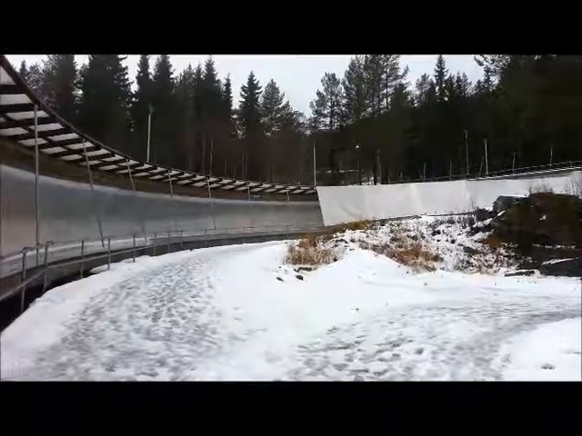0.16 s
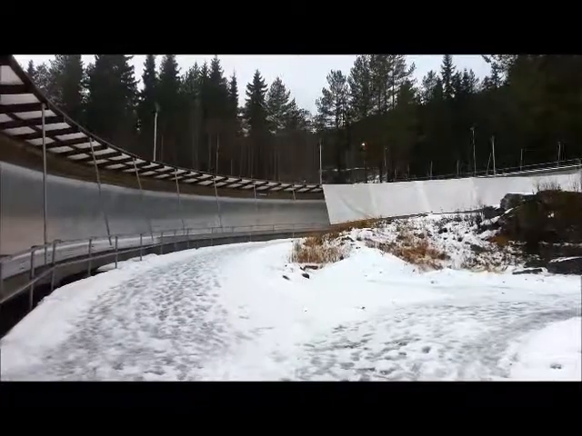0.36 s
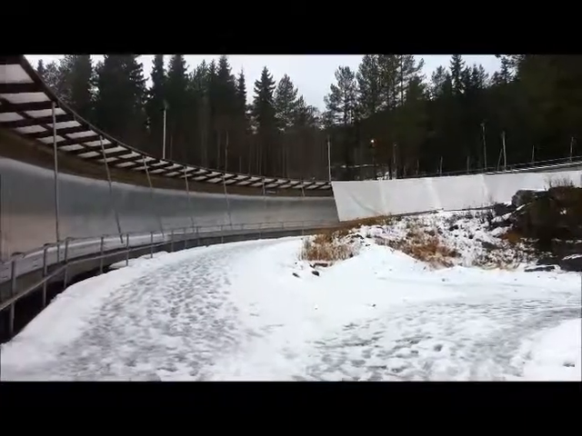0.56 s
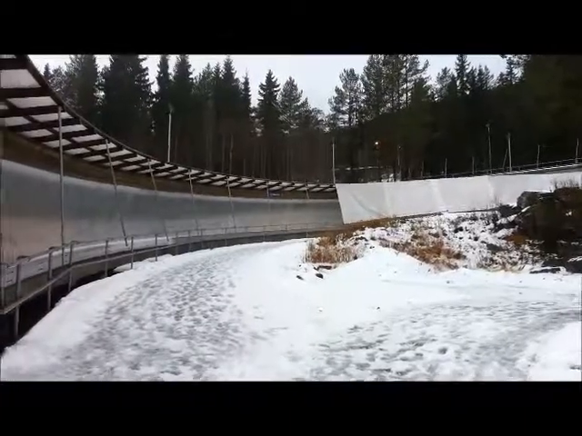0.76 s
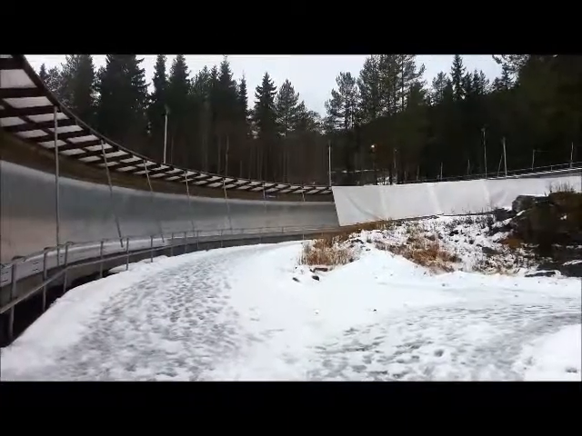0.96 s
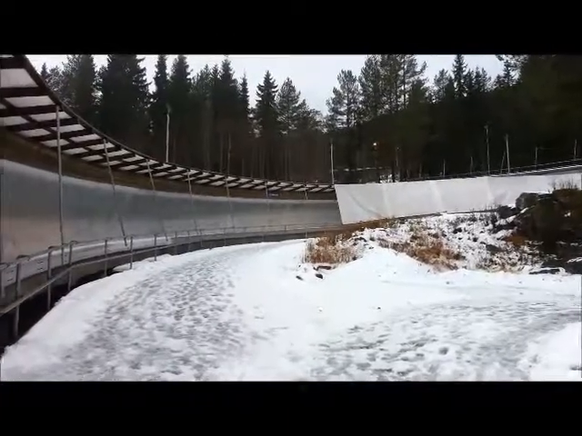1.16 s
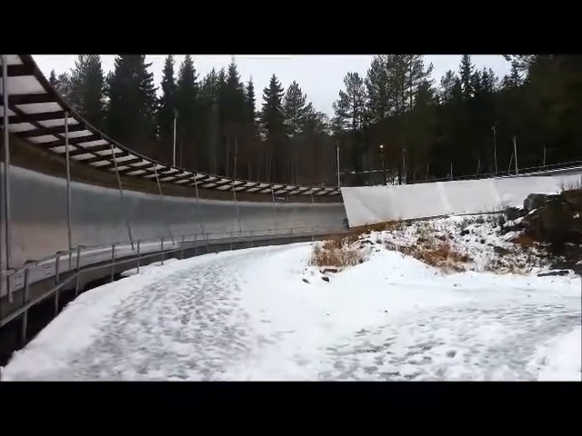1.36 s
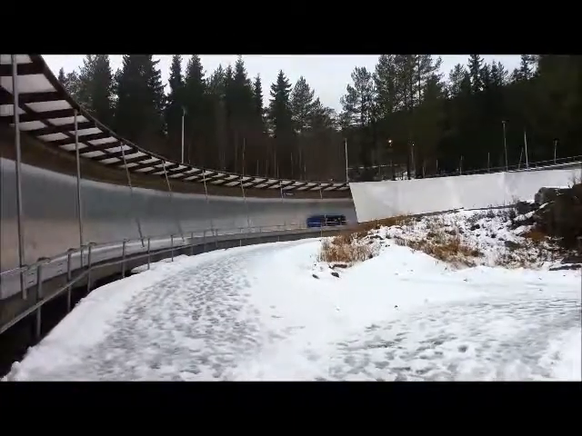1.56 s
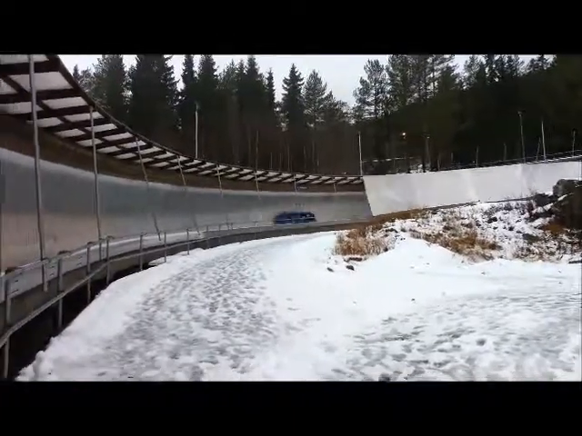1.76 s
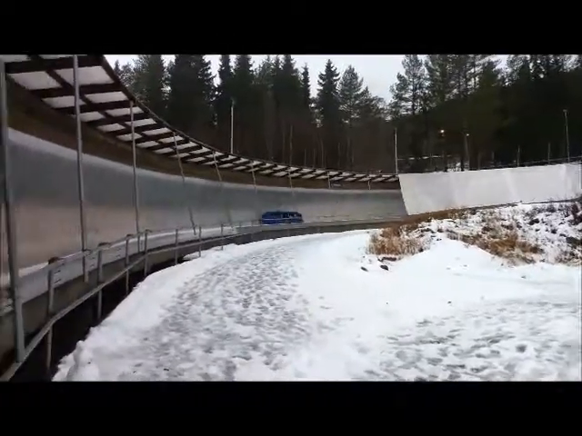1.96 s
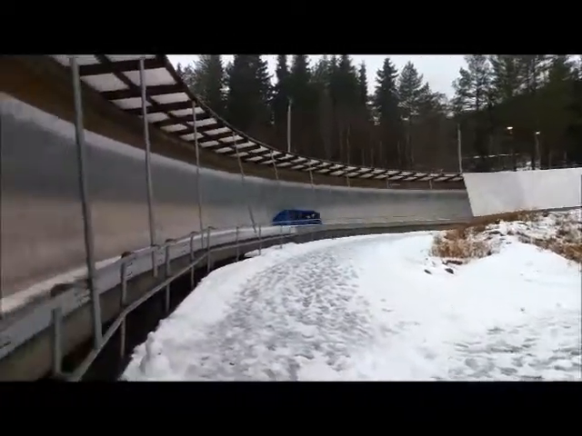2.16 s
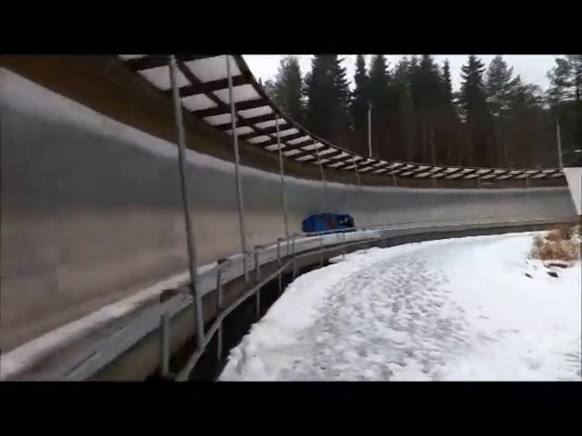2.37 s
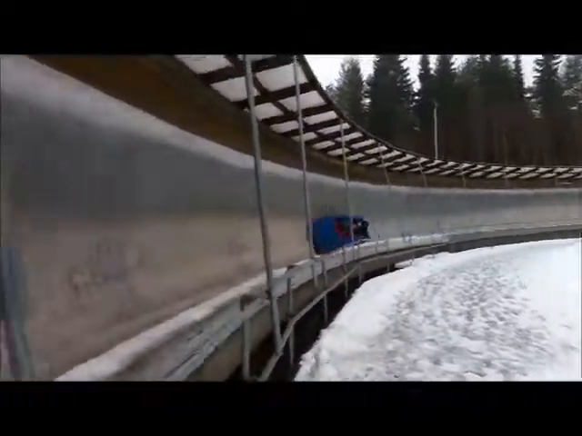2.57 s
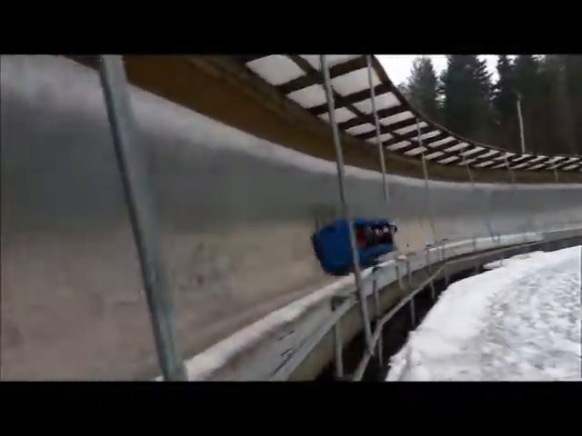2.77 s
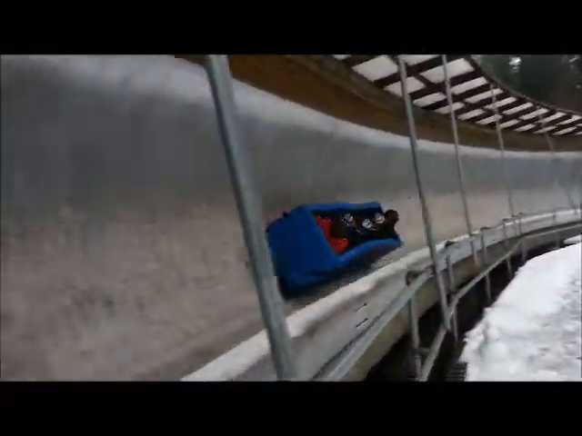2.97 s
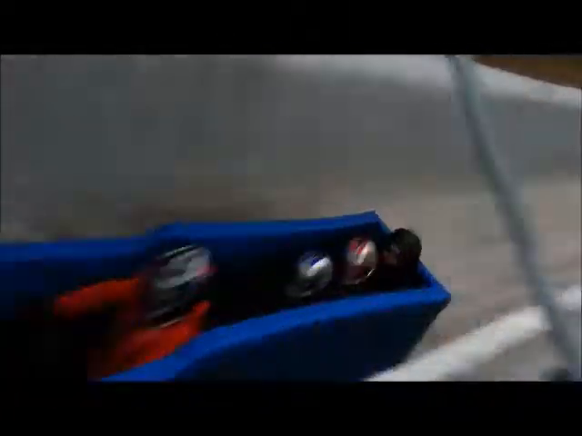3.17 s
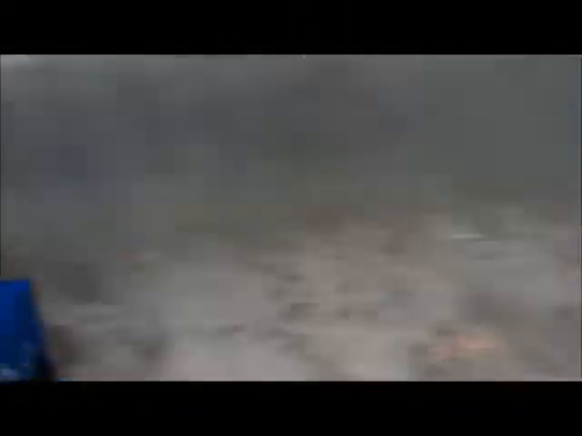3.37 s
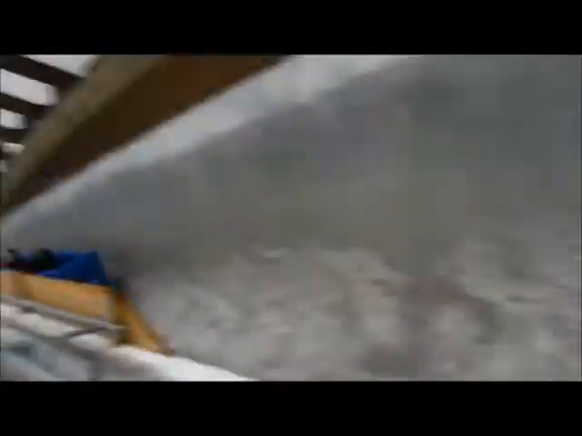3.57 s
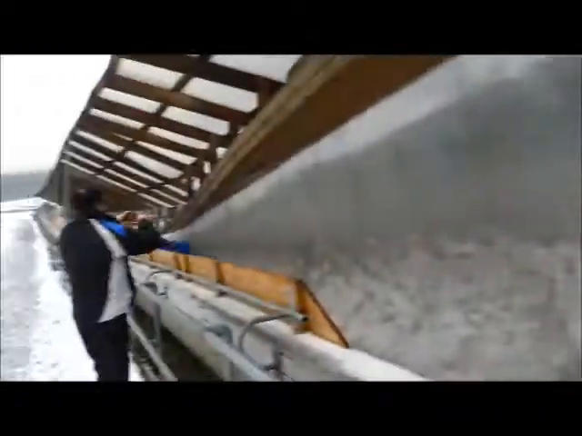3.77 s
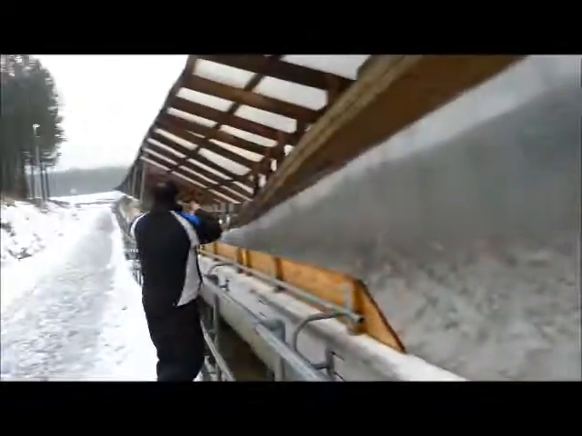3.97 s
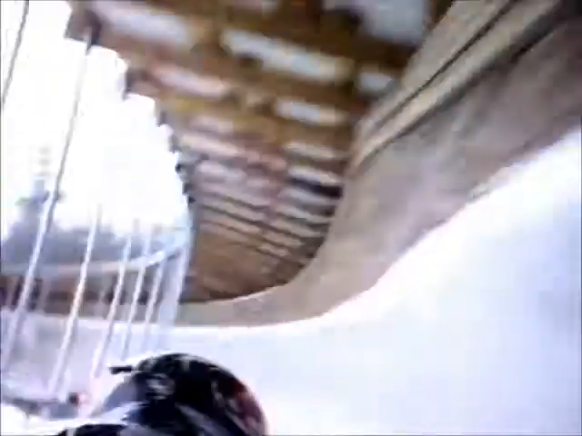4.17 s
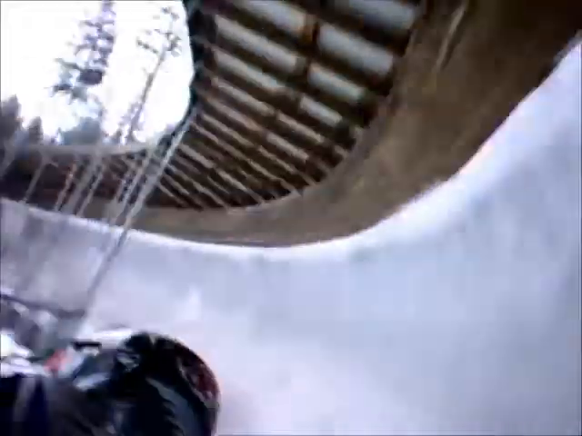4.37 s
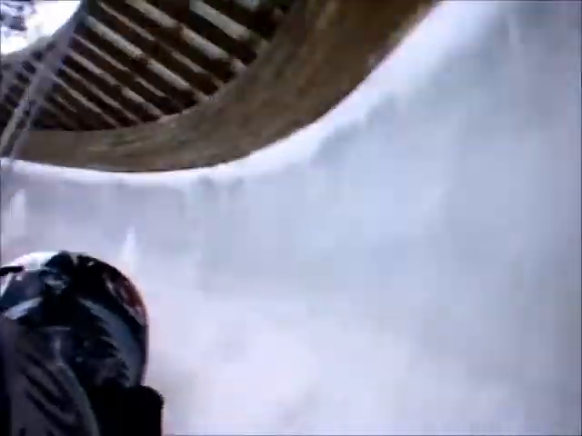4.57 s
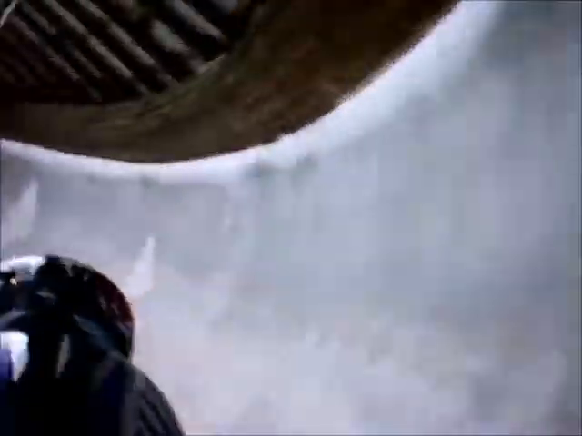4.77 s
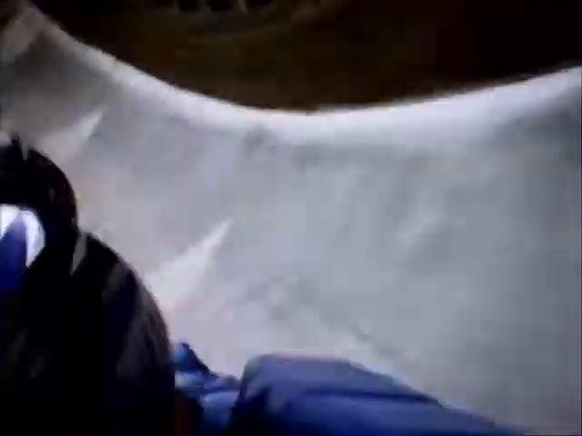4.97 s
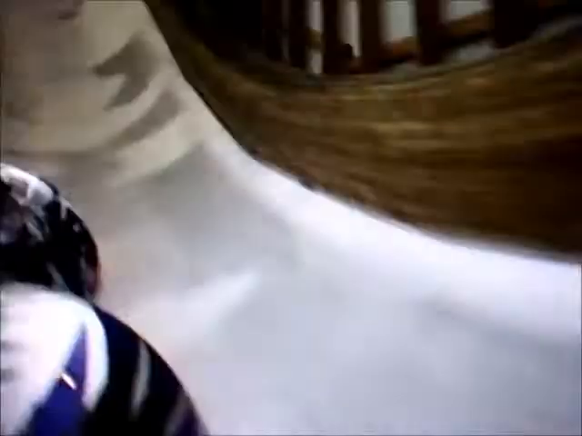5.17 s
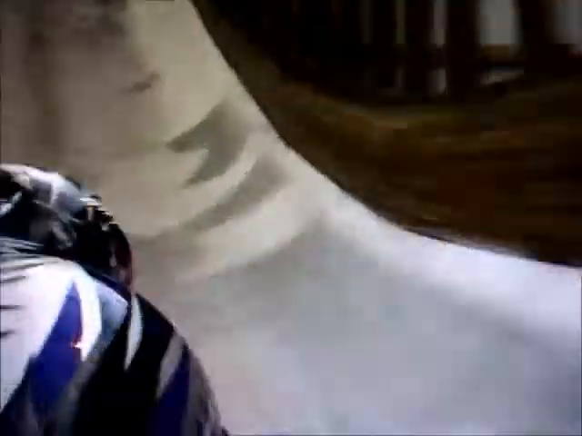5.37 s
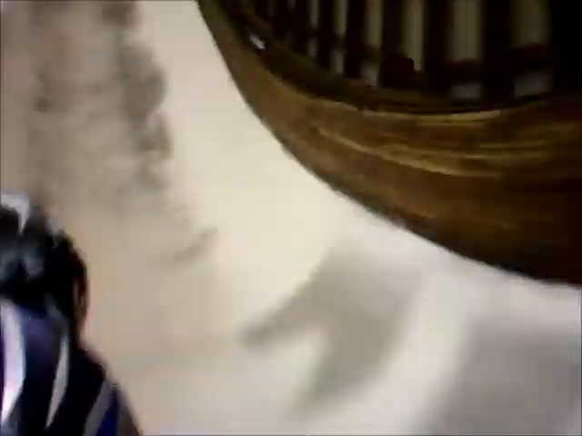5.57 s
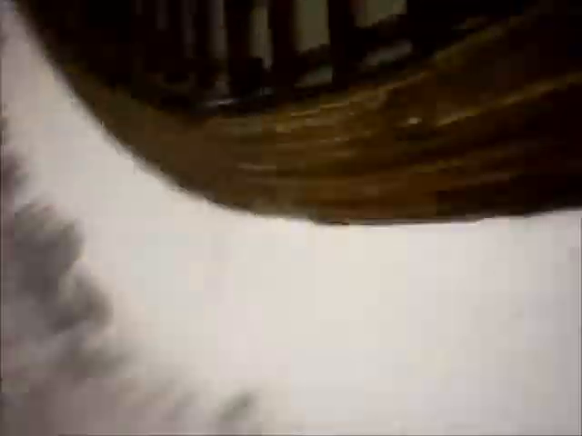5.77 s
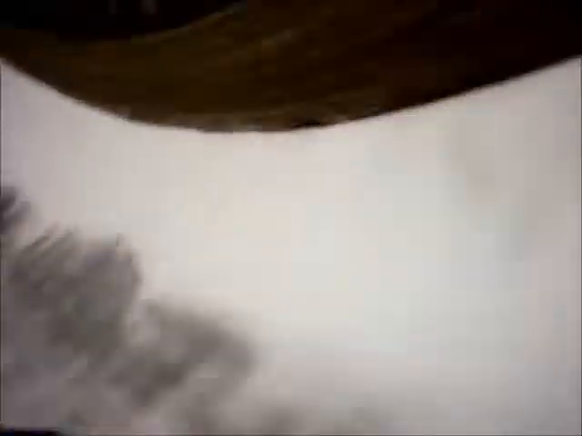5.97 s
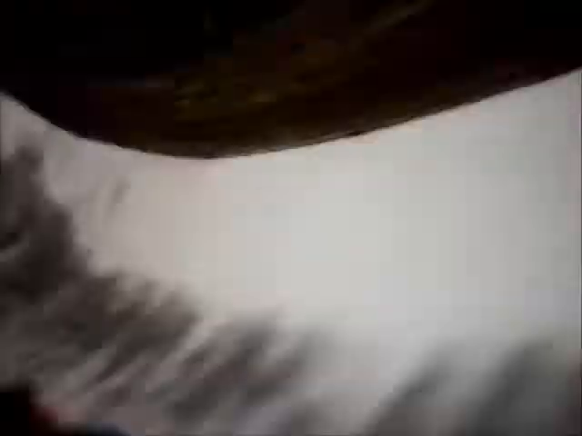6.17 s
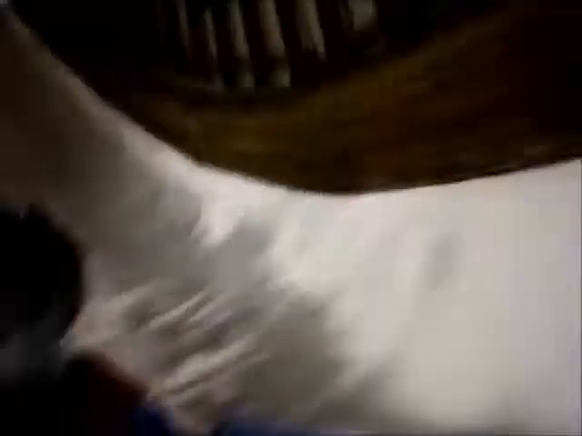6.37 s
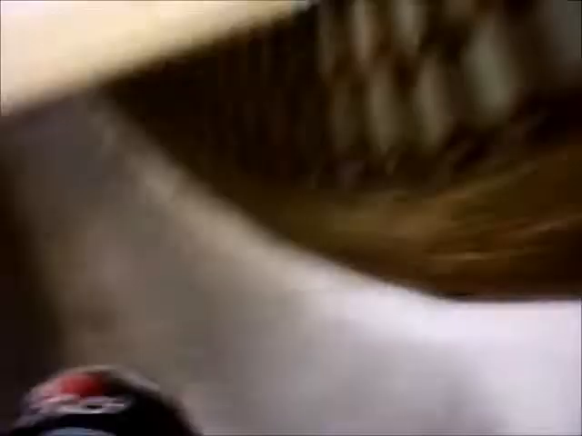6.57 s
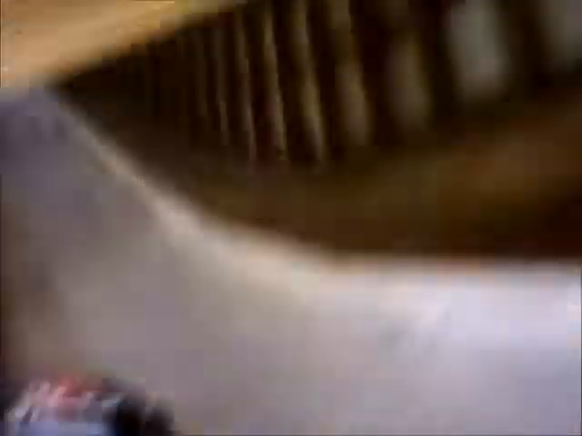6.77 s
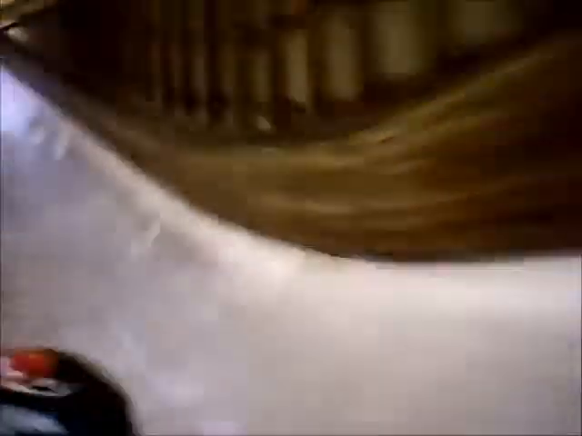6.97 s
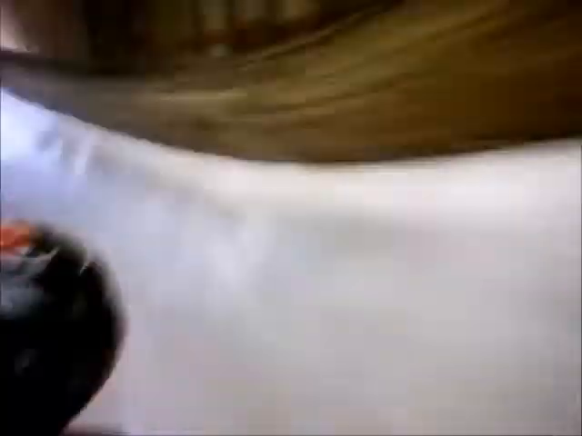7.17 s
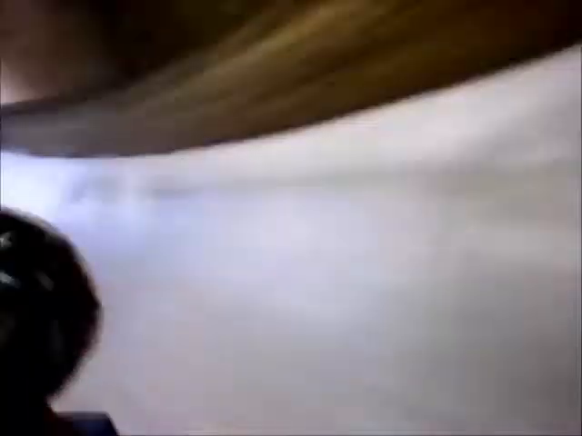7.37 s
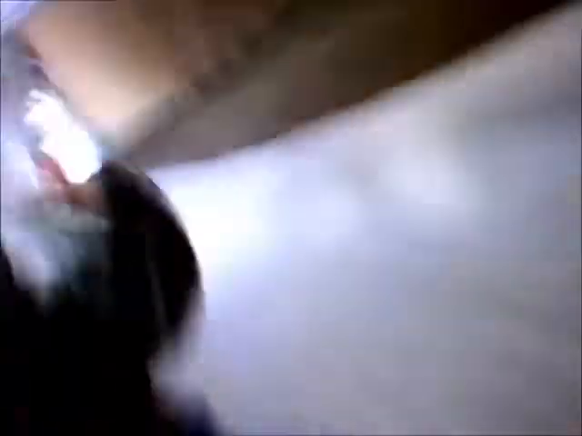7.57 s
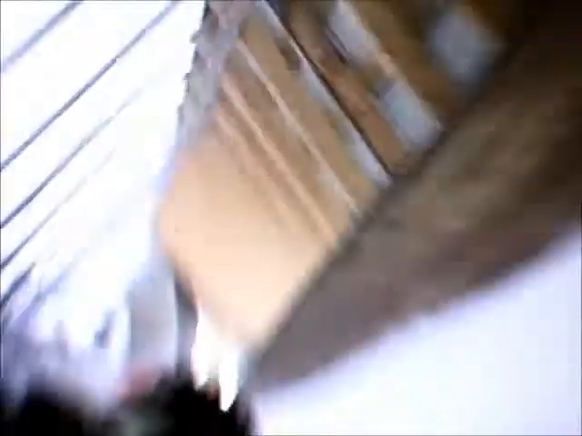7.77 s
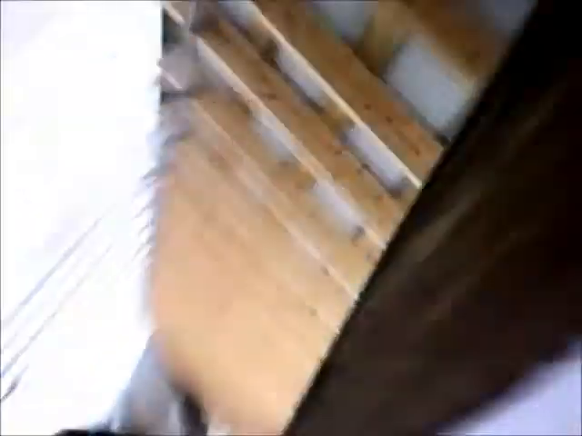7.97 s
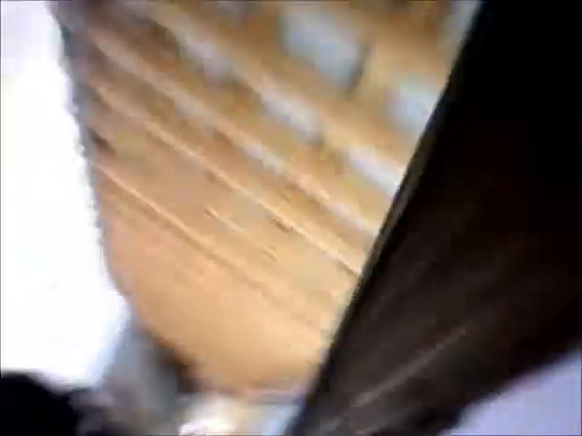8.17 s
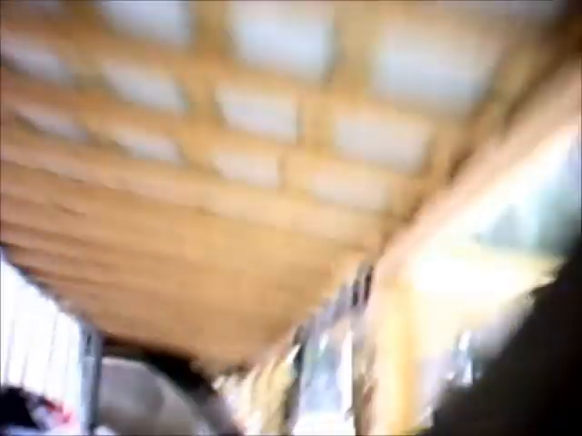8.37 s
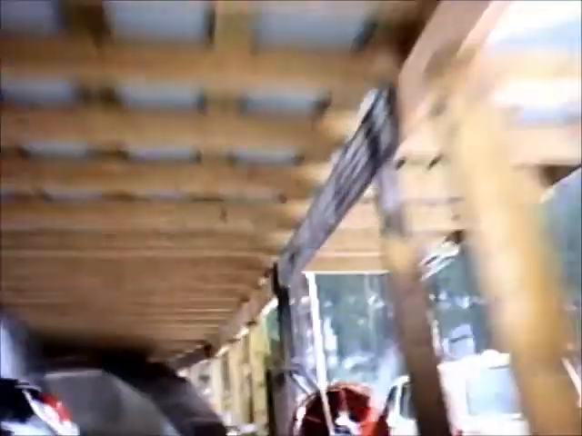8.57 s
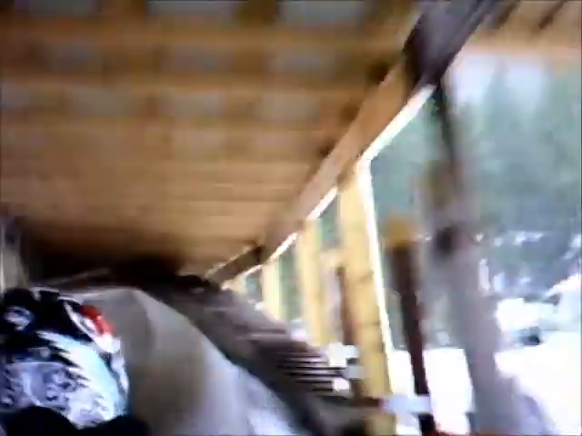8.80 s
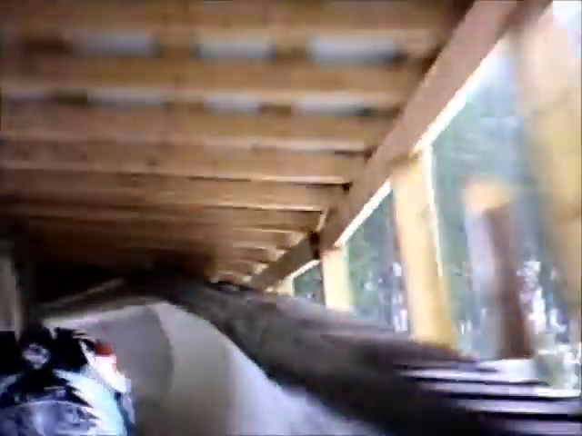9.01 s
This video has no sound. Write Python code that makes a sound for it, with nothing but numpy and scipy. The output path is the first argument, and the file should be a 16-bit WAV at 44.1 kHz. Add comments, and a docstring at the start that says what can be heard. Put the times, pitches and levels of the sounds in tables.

```python
"""A distant roar comes down a banked ice track, swells over rumble and runner scrape, and a sled rushes past.
Trackside, in stereo: coloured noise for channel, scrape and treble, plus damped modes for jolts and a click.
Then a hard cut to a small mono camera on board: gusts of wind and runner chatter ring its housing,
the hull drones, the air stream buffets the microphone, and struck modes make the knocks and thumps."""
import sys
import numpy as np
from scipy import signal
from scipy.fft import rfft, irfft
from scipy.io import wavfile
from scipy.ndimage import uniform_filter1d, map_coordinates

SR = 44100
rng = np.random.default_rng(int(sys.argv[2]) if len(sys.argv) > 2 else 0)


def int16_out(signal):
    """Quantize to a 16-bit WAV file."""
    q = np.round(np.clip(np.atleast_2d(signal).T, -1, 1) * 32767)
    wavfile.write(sys.argv[1], SR, q.astype(np.int16))


N = 398663
T = np.arange(N) / SR
CUT_S = 4.136  # from trackside to on board
TURN_S, TURN_SPAN_S = 3.23, 0.363  # the sled is abreast; length of the change from coming to going


def undb(db):
    """Decibels to amplitude."""
    return 10 ** (np.asarray(db) / 20)


def curves(table):
    """Columns of a table as straight lines in time."""
    s, *columns = np.transpose(table)
    return [np.interp(T, s, c) for c in columns]


def colour(x, spectrum):
    """A causal minimum-phase resonator, so that clicks ring after they strike; keeps the rms of x."""
    hz, db = np.transpose(spectrum)
    f = np.maximum(np.arange(4097) * SR / 8192, 1)
    log_gain = np.log(undb(np.interp(np.log(f), np.log(hz), db, -90, -90)))
    # folding the cepstrum onto positive time makes the response causal
    cepstrum = irfft(log_gain)
    cepstrum[1:4096] *= 2
    cepstrum[4097:] = 0
    response = irfft(np.exp(rfft(cepstrum)))
    y = signal.fftconvolve(np.atleast_2d(x), response[None], axes=1)[:, :N]
    return y / np.sqrt(np.mean(y ** 2) / np.mean(x ** 2))


def walk(rate, slew):
    """Random levels held 1 / rate s, slewed over a share of that time; spread 1."""
    hold = int(SR / rate)
    steps = np.repeat(rng.standard_normal(N // 100), hold)[:N]
    w = uniform_filter1d(steps, max(int(slew * hold), 1))
    return w / np.std(w)


def grit(scatter_db, shape):
    """Dense grains: noise whose samples are scattered in level, so that a few stand out; rms 1."""
    scatter = np.minimum(rng.exponential(size=shape), 3.5)
    x = rng.standard_normal(shape) * undb(scatter_db * scatter)
    return x / np.std(x)


def ring(s, hz, t60, rise_hz_s=0):
    """One damped mode struck at s by a push that builds over half a cycle; its pitch may rise."""
    out, start = np.zeros(N), int(s * SR)
    t = np.maximum(T[start:start + int(2 * t60 * SR)] - s, 0)
    wave = np.sin(2 * np.pi * (hz + rise_hz_s * t / 2) * t)
    decay = np.exp(-np.log(1000) * t / t60)
    out[start:start + len(t)] = wave * decay * np.minimum(2 * hz * t, 1)
    return out


def bend(pair, speed):
    """Both ports played at a changing speed, which bends every resonance."""
    place = np.cumsum(speed)
    return np.array([np.interp(place, np.arange(N), port) for port in pair])


def squash(x, top):
    """An input stage that rounds peaks off towards top."""
    return x / (1 + np.abs(x / top) ** 4) ** .25


# direction of the sled: t/s, left lags right/ms, scattered share (scaled by each layer's width),
# left minus right/dB
SLED_BEARING = [(0, -0.36, 1.2, 0), (.6, 0.26, 0.56, -0.5), (1.9, 0.11, 0.6, -1), (2.3, 0.057, 0.45, -1),
                (3, 0.031, 0.3, -0.7), (3.6, 0.14, 0.38, -0.5), (4.2, -0.03, 0.27, 0)]


def ports(spectrum, scatter_db, width):
    """One source at two microphone ports: a direct path with a lag, and sound scattered by the walls."""
    lag_ms, share, pan_db = curves(SLED_BEARING)
    direct, left, right = colour(grit(scatter_db, (3, N)), spectrum)
    late = map_coordinates(direct, [np.arange(N) - lag_ms * SR / 1000], order=3, mode="nearest")
    share = np.clip(width * share, 0, 1)
    pair = np.sqrt(1 - share) * np.array([late, direct]) + np.sqrt(share) * np.array([left, right])
    return pair * undb(np.array([pan_db, -pan_db]) / 2)


def turn(coming, going):
    """Equal-power change to the channel's resonances heard from behind as the sled passes."""
    share = np.clip((T - TURN_S) / TURN_SPAN_S + .5, 0, 1)
    return np.sqrt(1 - share) * coming + np.sqrt(share) * going


# colour of the roofed channel, sled coming and going: f/Hz, relative level/dB per Hz
ROAR_AHEAD = [(200, -29.5), (290, -12), (400, -4.5), (470, -5.5), (560, -3), (660, -5.5), (820, -7),
              (1140, -6), (1330, -13), (1600, -11), (2200, -29)]
ROAR_BEHIND = [(200, -25), (285, 0.5), (370, -4), (500, -1.5), (620, -1), (760, -2), (900, -1.5),
               (1080, -6), (1290, -1.5), (1600, -12), (1900, -11), (2300, -16)]
ROAR_SAG_PER_S = .12  # share of its pitch lost per second


def channel_roar(level_db):
    """Noise through the channel's resonances; they sink in pitch as the sled draws away."""
    since = np.clip(T - TURN_S - TURN_SPAN_S, -.5, .5)
    passing = (T > TURN_S - TURN_SPAN_S) * (T < CUT_S)
    coming = ports(ROAR_AHEAD, scatter_db=1.5, width=0.34)
    going = bend(ports(ROAR_BEHIND, scatter_db=2.0, width=0.24), 1 - ROAR_SAG_PER_S * since * passing)
    return undb(level_db) * turn(coming, going)


# colour of the concrete, sled coming and going: f/Hz, relative level/dB per Hz
RUMBLE_AHEAD = [(20, -52), (45, -29), (65, -21.5), (100, -11.5), (150, -6.5), (260, 1), (340, -1.5),
                (600, -48)]
RUMBLE_BEHIND = [(20, -53), (50, -34), (90, -13.5), (150, -3.5), (260, 1), (340, -20.5), (600, -40)]


def concrete_rumble(level_db):
    """Low noise from the concrete, nearly the same at both ports."""
    coming = ports(RUMBLE_AHEAD, scatter_db=3.5, width=0.037)
    going = ports(RUMBLE_BEHIND, scatter_db=-1.5, width=0.025)
    return undb(level_db) * turn(coming, going)


# surges of the boom: t/s, level/dB
BOOM_SURGES = [(0.0, -39), (0.1, -26.5), (0.23, -46), (0.25, -29.5), (0.53, -30), (0.62, -18), (0.65, -37),
               (0.72, -32), (0.74, -13.5), (0.8, -13), (0.96, -21.5), (1.24, -11), (1.32, -21), (1.38, -12),
               (1.5, -18), (1.51, -15), (1.68, -24), (1.7, -14.5), (2.16, -23), (2.19, -9), (2.23, -16.5),
               (2.3, -14.5), (2.45, -17), (2.48, -5), (2.51, -25), (2.58, -11), (2.64, -15), (2.89, -11.5),
               (2.95, -25), (2.98, -7), (3.02, -16.5), (3.27, -16), (3.43, -31), (3.48, -13.5), (3.6, -26),
               (3.635, -13), (3.68, -30), (3.78, -15), (3.9, -24), (4.12, -15)]
# its centre before the wander: t/s, f/Hz
BOOM_CENTRE = [(0, 481), (.62, 530), (.8, 499), (1.1, 520.5), (1.25, 440.2), (1.4, 570), (2.2, 499.4),
               (2.7, 549.3), (3.0, 491), (3.3, 479.3), (3.42, 300.3), (3.75, 290.2), (3.95, 400),
               (4.14, 489)]
# main resonance of the channel before bending: f/Hz, relative level/dB per Hz
BOOM_BAND = [(380, -31.5), (450, 0), (490, 0), (525, -2.5), (580, -3.5), (700, -32)]


def channel_boom():
    """The roofed channel booms in surges on its main resonance, whose pitch shifts and wanders."""
    speed = curves(BOOM_CENTRE)[0] / 500 * (1 + .04 * walk(7, 0.908))  # the band is centred on 500 Hz
    return undb(curves(BOOM_SURGES)[0]) * bend(ports(BOOM_BAND, scatter_db=1.5, width=0.13), speed)


# brief bursts in scrape and treble: t/s, scrape gain/dB, treble gain/dB
BURSTS = [(.8, 0, 15), (1.18, 1.5, 13), (1.53, 4.5, 11), (1.64, 4.5, 11), (1.8, -4, 5), (1.955, 5, 13),
          (2.22, 3, 12), (2.45, 3.5, 13), (2.8, 3, -13), (2.97, 0, 4), (3.05, 5, 0), (3.145, 3.5, 5),
          (3.625, 8, 2), (3.785, 4, -13), (3.95, 2, -14), (3.995, 5.5, 0), (4.07, 0, 12.5)]
BURST_S = 0.013  # half width of a burst


def bursts():
    """The runners bite briefly in the scrape, and the treble flares or dips: bell shapes in dB."""
    return sum(np.outer(gains_db, np.exp(-((T - s) / BURST_S) ** 2)) for s, *gains_db in BURSTS)


# runners on ice: f/Hz, relative level/dB per Hz
SCRAPE_BAND = [(900, -15.5), (1500, -6.5), (2100, -4), (3200, -9.5), (4500, -18.5), (5500, -28.5),
               (7000, -40.5)]


def runner_scrape(level_db):
    """Dense ice grains under the runners, with a flicker of its own."""
    return undb(level_db + 1.0 * walk(19, 0.19)) * ports(SCRAPE_BAND, scatter_db=2.5, width=1.85)


# treble grains: f/Hz, relative level/dB per Hz
TREBLE_BAND = [(4000, -0.5), (5500, -15.5), (7000, -13), (10000, -23), (15000, -42.5)]
TREBLE_BASE_DB, TREBLE_RISE_DB_S, TREBLE_FALL_DB_S = -36, 10, 3.5  # base level abreast, its rise and fall


def treble_spray(treble_db):
    """Sparse bright grains of treble, with brief brighter bursts; the base level peaks at the pass."""
    base_db = TREBLE_BASE_DB - np.maximum(TREBLE_RISE_DB_S * (TURN_S - T), TREBLE_FALL_DB_S * (T - TURN_S))
    level_db = base_db + treble_db + 0.75 * walk(18, 0.99)
    return undb(level_db) * ports(TREBLE_BAND, scatter_db=7.0, width=2.7)


# abrupt onset and fade: t/s, level/dB
HISS_LEVEL = [(0, -73), (.18, -69), (.184, -32), (.3, -30), (.5, -33.5), (.6, -48), (.8, -75)]
# f/Hz, relative level/dB per Hz
HISS_BAND = [(1200, -19.5), (1700, 1), (2500, 3.5), (3600, 2.5), (4500, -3.5), (5500, -15.5), (8000, -27),
             (10000, -43)]


def distant_hiss():
    """A wide hiss sets in abruptly far up the track and fades."""
    return undb(curves(HISS_LEVEL)[0]) * ports(HISS_BAND, scatter_db=0.0, width=1.5)


# jolts over joints in the ice: t/s, strength/dB
ICE_JOLTS = [(0.609, -13), (0.740, -10), (0.788, -2)]
# modes of the channel: f/Hz, level re strength/dB, t60/s
CHANNEL_MODES = [(440, -4.5, 0.46), (546, -5, 0.26), (1050, -12, 0.043)]


def joint_jolts():
    """Each joint in the ice jolts the sled and strikes all modes of the channel."""
    return sum(undb(db + mode_db) * ring(s, hz, t60)
               for s, db in ICE_JOLTS for hz, mode_db, t60 in CHANNEL_MODES)


# cowling: t/s, level/dB, f/Hz
COWL_TONE = [(0, -65, 690), (3.1, -41, 690), (3.15, -13, 690), (3.22, -28, 750), (3.31, -19, 860),
             (3.37, -11.5, 720), (3.45, -30, 680), (3.52, -16, 800), (3.6, -22, 830), (3.7, -17, 940),
             (3.8, -44, 900), (3.97, -16, 740), (4.2, -30, 700)]
# its band before bending: f/Hz, relative level/dB per Hz
COWL_BAND = [(600, -33), (670, -1.5), (700, -2.5), (740, -7.5), (840, -35)]


def hollow_cowl():
    """The hollow cowling resonates around the pass: a narrow noise band with moving pitch."""
    level_db, hz = curves(COWL_TONE)
    speed = hz / 700  # the band is centred on 700 Hz
    return undb(level_db) * bend(ports(COWL_BAND, scatter_db=0.5, width=0.22), speed)


# click near the pass: t/s, level/dB, f/Hz, t60/s
BRIGHT_CLICK = (3.326, -18, 11500, .004)


def bright_click():
    """One very short, high click near the pass: a damped mode."""
    s, db, hz, t60 = BRIGHT_CLICK
    return undb(db) * ring(s, hz, t60)


# trackside levels before chatter and bursts: t/s, roar level/dB, rumble level/dB, scrape level/dB
PASS_LEVELS = [(0, -27.5, -40.5, -37), (.45, -26.5, -36.5, -40.5), (.603, -25.5, -34, -32.5),
               (.609, -16, -21, -26.5), (.65, -22, -27, -31), (.727, -18.5, -25, -33.5),
               (.74, -14, -19, -31), (.85, -13, -17.5, -25), (.95, -12.5, -21.5, -23.5),
               (1.3, -12.5, -22.5, -23), (1.9, -10, -27, -21), (2.15, -11, -26, -19.5),
               (2.3, -11, -18.5, -19.5), (2.95, -10, -24.5, -20), (3.15, -11.5, -19.5, -17),
               (3.4, -13.5, -22.5, -18.5), (3.75, -10, -26.5, -20.5), (4.0, -12, -18.5, -21.5),
               (4.14, -14.5, -21, -23)]


def trackside():
    """Runner chatter moves roar, rumble and scrape together; the mix meets a soft limit."""
    roar_db, rumble_db, scrape_db = curves(PASS_LEVELS)
    chatter = walk(35, 0.18)
    bite_db, treble_db = bursts()
    mix = channel_roar(roar_db + 1.25 * chatter) + concrete_rumble(rumble_db + 0.91 * chatter)
    mix = mix + channel_boom() + runner_scrape(scrape_db + bite_db + 1.2 * chatter)
    mix = mix + treble_spray(treble_db) + distant_hiss() + joint_jolts() + hollow_cowl() + bright_click()
    return squash(mix, top=1.2)


def shudder():
    """The runners judder unevenly: each cycle sets in hard and sags; some cycles are deeper. In dB."""
    per_s, spread, depth_db = 42, .3, 6
    cycles = np.cumsum(per_s * np.exp(spread * walk(25, .8))) / SR
    depth = rng.exponential(size=N // 100)[cycles.astype(int)]
    sag = np.minimum(depth, 2) * ((cycles % 1) ** 2.9 - .3)
    return -depth_db * uniform_filter1d(sag, 90)


# spits of air and ice: t/s, strength/dB, depth of the lull before it/dB (negative swells), hold/s
AIR_SPITS = [(4.185, -7.5, -0.5, 0.015), (4.2706, 1.5, 7.5, 0.048), (4.369, -7, 7, 0.038),
             (4.409, -0.5, 2.5, 0.006), (4.4326, -3.5, 3, 0.03), (4.601, 1, 12, 0.028),
             (4.646, 0.5, 10.5, 0.011), (4.697, -0.5, 6, 0.011), (4.787, -1.5, 7, 0.0045),
             (5.0684, -3.5, 8.5, 0.0044), (5.118, -5.5, 5.5, 0.01), (5.154, -1, 11, 0.019),
             (5.233, -3, -1.5, 0.019), (5.269, -5.5, 0, 0.043), (5.3236, -1, -1.5, 0.0037),
             (5.372, -5, 6.5, 0.017), (5.411, 3.4, 1, 0.006), (5.426, -2, 1, 0.004), (5.458, -5.5, 3, 0.01),
             (5.524, -1, 2, 0.032), (5.671, -4.5, 1, 0.032), (5.707, -5.5, 4.5, 0.012),
             (5.761, 2, 4.5, 0.008), (5.833, -1, -1.5, 0.014), (5.904, -5, -1.7, 0.016),
             (5.922, -4.5, 0.5, 0.027), (6.016, -8, 1.3, 0.012), (6.065, -4, -2, 0.018),
             (6.148, -8, 1.5, 0.0037), (6.169, -3.5, -1.5, 0.003), (6.572, -4, 2.5, 0.016),
             (6.59, 0, -2.5, 0.0086), (6.6435, 5.5, 0, 0.0079), (6.675, -3.5, 7, 0.013),
             (6.733, 1.5, 0.5, 0.006), (6.8848, -6, -3, 0.038), (6.954, -2, 2, 0.0047),
             (7.028, -6, 4, 0.017), (7.092, -2, 1.5, 0.007), (7.097, -6.5, -0.5, 0.023),
             (7.142, 0, 1, 0.018), (7.249, -5, 6.5, 0.012), (7.264, 1.5, 6, 0.0045),
             (7.294, -1.5, 2.5, 0.016), (7.347, -1, 1, 0.018), (7.381, -1.5, -1.5, 0.0044),
             (7.42, 3, 1.5, 0.005), (7.694, -1, -0.5, 0.01), (7.732, -3, 0.5, 0.01),
             (7.809, -3.5, -5, 0.027), (7.948, -2.2, -1.5, 0.013), (8.022, -6, 0.5, 0.013),
             (8.041, -5.5, 2, 0.013), (8.075, -0.5, 0, 0.0033), (8.14, -1, 1.5, 0.0062),
             (8.237, -12, 6, 0.019), (8.26, -4.5, 2.5, 0.005), (8.28, -1, 7, 0.006),
             (8.4864, -3, -2.5, 0.03), (8.599, 1.7, 5.5, 0.017), (8.636, -9, 2.5, 0.036),
             (8.74, -4, -1.5, 0.022), (8.906, 3, 2.5, 0.022), (8.9366, 2, 2, 0.0051)]
GUST_DB, GUST_RISE_S, GUST_FALL_S = -11.5, .0015, 0.0049  # puff re spit strength, its attack and decay
LULL_LEAD_S, LULL_S = .009, .007  # lull centre ahead of the spit, half width


def gusts(rush_db):
    """The stream dips or swells just before each spit; a puff sets in hard, holds and breaks off."""
    lull_db, puffs = np.zeros(N), np.zeros(N)
    for s, db, depth_db, hold_s in AIR_SPITS:
        near = slice(int((s - .1) * SR), int((s + .2) * SR))
        t = T[near] - s
        lull_db[near] += depth_db * np.exp(-((t + LULL_LEAD_S) / LULL_S) ** 2)
        attack = np.clip(1 + t / GUST_RISE_S, 0, 1)
        release = np.exp(-np.maximum(t - hold_s, 0) / GUST_FALL_S)
        puffs[near] += undb(db + GUST_DB) * attack * release
    return np.hypot(undb(rush_db - lull_db), puffs)


# camera housing: f/Hz, relative level/dB per Hz
HOUSING_BAND = [(250, -27), (400, -15), (800, -14.5), (1200, -14.5), (1600, -11), (2250, -6.5),
                (2480, -3.5), (2600, -1.5), (2690, 0), (2790, -2.5), (3050, -9.5), (3400, -8.5), (3700, -5),
                (3900, -19), (4200, -4)]


def housing_rush(rush_db, judder_db, eddies):
    """Ragged bursts of eddies and runner judder drive grains that ring the housing."""
    flutter = walk(220, 0.38)
    force = gusts(rush_db) * undb(judder_db + 0.98 * eddies + 1.37 * flutter)
    return colour(force * grit(6.0, N), HOUSING_BAND)


# hull: f/Hz, relative level/dB per Hz
HULL_BAND = [(250, -31.5), (400, -19), (610, -17), (800, -11), (880, -4.5), (930, 2), (990, -2.5),
             (1150, -3), (1550, -12), (2300, -20.5), (2600, -7.5), (2690, -0.5), (2790, -6.5), (3100, -28)]


def hull_drone(hull_db, judder_db, eddies):
    """Noise drones through the hull's resonances, only lightly juddered."""
    level_db = hull_db + .3 * judder_db + 0.88 * eddies + .6 * walk(60, .6)
    return colour(undb(level_db) * grit(2.3, N), HULL_BAND)


# air stream on the microphone: f/Hz, relative level/dB per Hz
BUFFET_BAND = [(12, -31), (22, -8.5), (50, -6), (130, 0), (220, -6), (330, -12.5), (600, -36.5)]


def wind_buffet(buffet_db, judder_db, eddies):
    """The air stream buffets the microphone: low noise in uneven swells."""
    level_db = buffet_db + 0.66 * judder_db + 0.59 * eddies + 1.9 * walk(55, 0.54)
    return undb(level_db) * colour(rng.standard_normal(N), BUFFET_BAND)


# housing modes: f/Hz, relative level/dB, share of the spit's t60
SHELL_MODES = [(2680, 1, 0.14), (3690, -5.5, 0.94), (2260, -7.5, 0.43)]
SPIT_T60_S, SPIT_RING_DB = 0.02, -6.5  # ring time before the share, ring re spit strength


def spit_rings():
    """Each spit strikes the modes of the housing."""
    return sum(undb(db + SPIT_RING_DB + mode_db) * ring(s, hz, share * SPIT_T60_S)
               for s, db, *_ in AIR_SPITS for hz, mode_db, share in SHELL_MODES)


# bright ticks: t/s, level/dB
BRIGHT_TICKS = [(4.58, -26), (6.1794, -30), (6.656, -19.5), (6.7366, -15.5)]


def bright_ticks():
    """Faint single-sample clicks."""
    return sum(undb(db) * (np.arange(N) == int(s * SR)) for s, db in BRIGHT_TICKS)


# blows on the hull: t/s, strength/dB, f/Hz at the blow, share of the panel's t60, crack re strength/dB
HULL_KNOCKS = [(5.156, -14, 1100, 0.88, -10), (6.15, 0, 890, 0.57, -15), (6.180, 3, 1050, 0.53, -10),
               (6.188, -7, 935, 0.61, -15), (6.3098, -3, 546, 0.18, -15), (6.349, -2.5, 854, 1, -18),
               (6.356, 0, 1050, 0.4, -16), (6.471, 3, 1290, 0.6, -13), (6.4762, -7, 746, 0.54, -20),
               (6.494, 0, 1270, 0.52, -9), (6.4985, -4.5, 645, 0.83, -20), (7.763, -14, 890, 0.85, 14),
               (8.283, -13.5, 1250, 1.5, -8), (8.907, -9, 996, 0.7, -10)]
# panel modes: f/Hz, t60/s before the share
PANEL_MODES = [(420, 0.21), (610, 0.058), (780, 0.021), (940, 0.048), (1120, 0.035), (1350, 0.037),
               (1600, 0.0089)]
REACH_DB = 40.5  # how fast modes fall off, per octave squared from the blow


def hull_knocks():
    """Loose parts knock: each blow rings the panel modes near its pitch and cracks in the housing."""
    out = np.zeros(N)
    for s, db, hz, share, crack_db in HULL_KNOCKS:
        body = sum(undb(-REACH_DB * np.log2(mode_hz / hz) ** 2) * ring(s, mode_hz, share * t60)
                   for mode_hz, t60 in PANEL_MODES)
        crack = undb(crack_db) * ring(s, hz=2620, t60=0.021)
        out += undb(db) * (body + crack)
    return out


# bumps: t/s, level/dB, f/Hz
BUMP_THUMPS = [(5.372, -14, 130), (5.834, -5, 132), (6.699, -14, 135), (6.879, 0, 135), (6.904, -2, 197),
               (7.053, -5, 135), (7.415, -4, 159), (7.565, -13, 107), (8.494, -12, 202),
               (8.793, -10.5, 178)]


def bump_thumps():
    """The sled thumps over bumps: one short low mode each."""
    return sum(undb(db) * ring(s, hz, t60=0.039) for s, db, hz in BUMP_THUMPS)


# sprung part: t/s, level/dB, f/Hz, t60/s, rise/Hz per s
SPRUNG_TWANG = (6.4985, -7, 590, .085, 9500)


def sprung_twang():
    """A sprung part rings on after a knock, rising in pitch."""
    s, db, hz, t60, rise_hz_s = SPRUNG_TWANG
    return undb(db) * ring(s, hz, t60, rise_hz_s)


# on-board levels before judder, eddies and gusts: t/s, rush level/dB, hull level/dB, buffet level/dB
RIDE_LEVELS = [(4.14, -20, -23.5, -28), (4.268, -22, -22.5, -21.5), (4.273, -16, -18, -21.5),
               (4.583, -10.5, -19.5, -19.5), (4.588, -19, -20, -18), (4.7, -19, -21.5, -20),
               (4.82, -21.5, -27.5, -24), (5.02, -21.5, -25, -27), (5.17, -17, -22.5, -19.5),
               (5.34, -20.5, -23, -23), (5.5, -13, -18.5, -20), (5.65, -17.5, -26.5, -25),
               (5.92, -21.5, -21.5, -22), (6.0, -21, -21.5, -21), (6.4, -21, -25.5, -24.5),
               (6.55, -17.5, -20, -21.5), (6.65, -11.5, -18, -18), (6.9, -18, -17.5, -18.5),
               (7.0, -16.5, -21.5, -22), (7.14, -14, -20, -20.5), (7.25, -21, -20.5, -23),
               (7.5, -23.5, -21.5, -26), (7.7, -19, -21, -19.5), (7.95, -15, -18.5, -22),
               (8.2, -20.5, -22, -22.5), (8.6, -13.5, -21, -24.5), (8.72, -19.5, -25, -25.5),
               (8.82, -15.5, -21.5, -22), (9.04, -19, -21.5, -23)]


def on_board():
    """Wind, hull and blows overload the small camera softly in three stages with a narrow band."""
    rush_db, hull_db, buffet_db = curves(RIDE_LEVELS)
    judder_db, eddies = shudder(), walk(45, 0.69)
    wind = housing_rush(rush_db, judder_db, eddies) + hull_drone(hull_db, judder_db, eddies)
    wind = wind + wind_buffet(buffet_db, judder_db, eddies)
    sound = wind + spit_rings() + hull_knocks() + bump_thumps() + sprung_twang()
    narrow = signal.ellip(8, .3, 70, 3900, fs=SR, output="sos")  # low pass, Hz
    for top in (1.0, .88, .79):
        sound = signal.sosfilt(narrow, squash(sound, top))
    return sound + bright_ticks()  # the ticks bypass the narrow band


def scene():
    """A hard cut from one camera to the other, with two milliseconds of silence."""
    return trackside() * (T < CUT_S - .001) + on_board() * (T > CUT_S + .001)


def record(dry):
    """Peaks clip at full scale; the top is cut above 15.7 kHz."""
    top = signal.ellip(8, .2, 70, 15700, fs=SR, output="sos")
    return np.clip(signal.sosfilt(top, np.clip(dry, -1, 1)), -1, 1)


dry = scene()
out = record(dry)
int16_out(out)
```